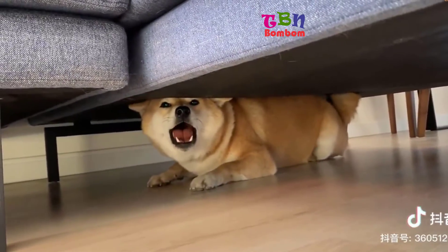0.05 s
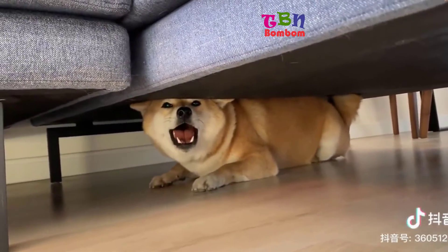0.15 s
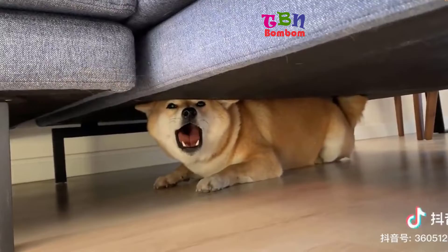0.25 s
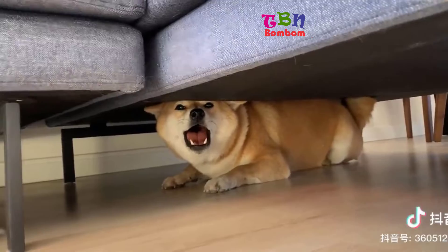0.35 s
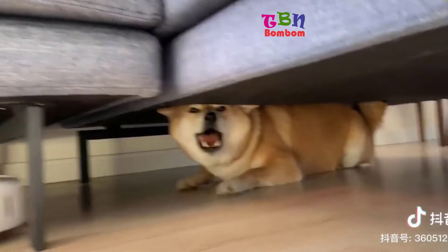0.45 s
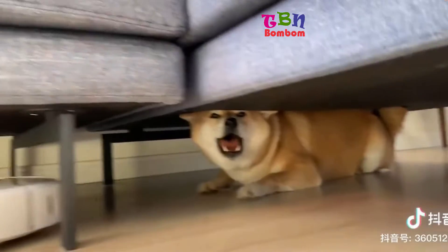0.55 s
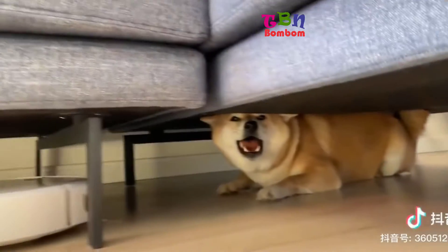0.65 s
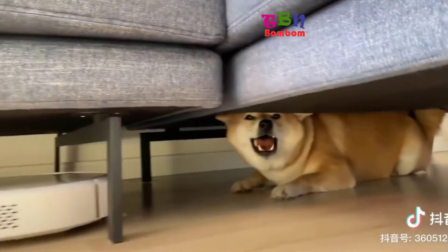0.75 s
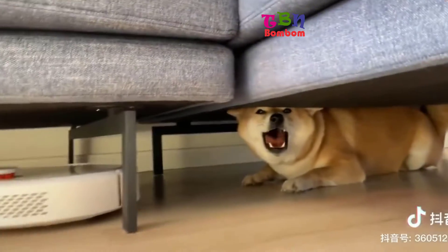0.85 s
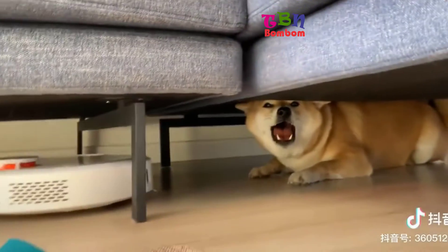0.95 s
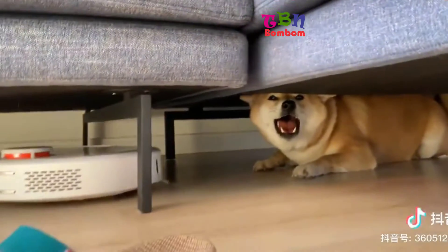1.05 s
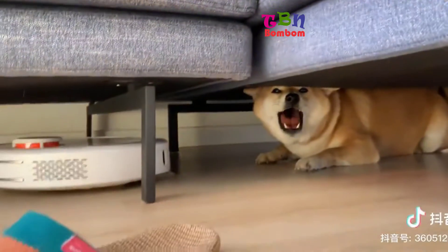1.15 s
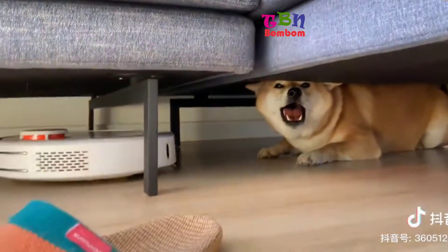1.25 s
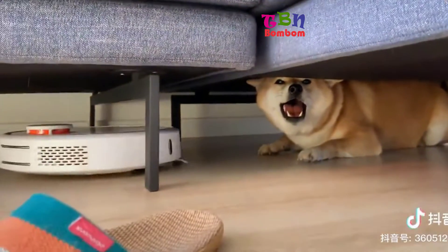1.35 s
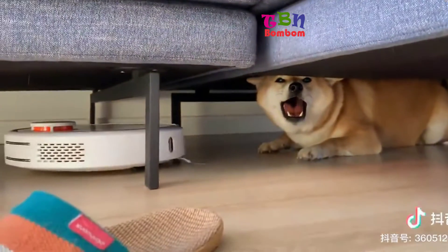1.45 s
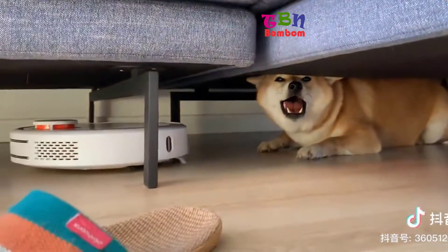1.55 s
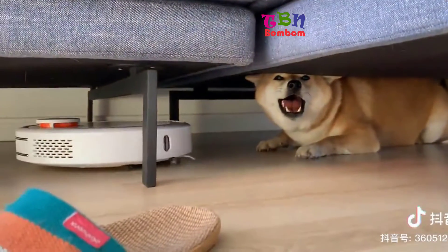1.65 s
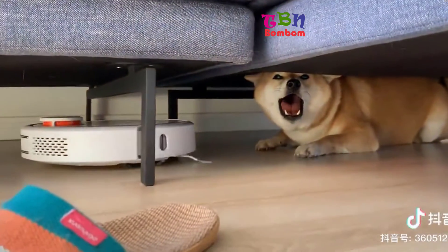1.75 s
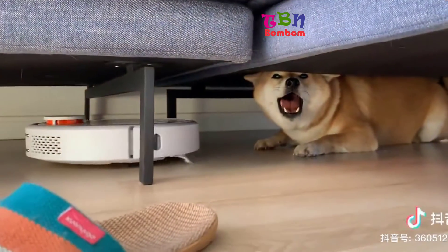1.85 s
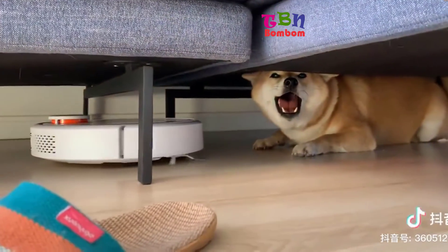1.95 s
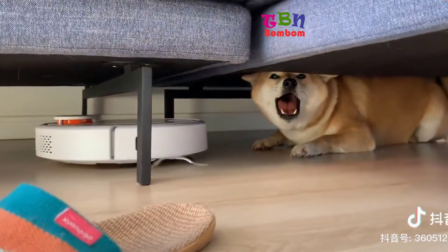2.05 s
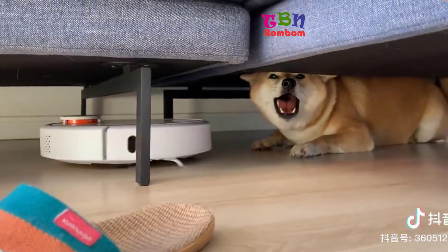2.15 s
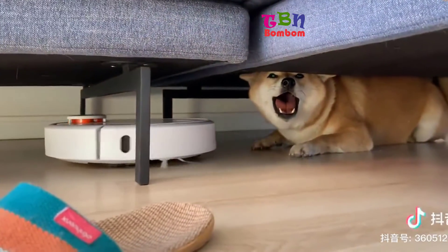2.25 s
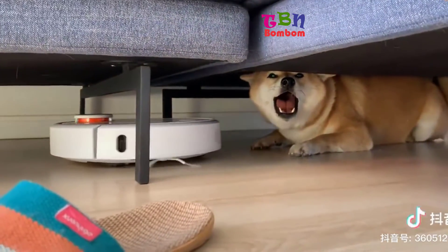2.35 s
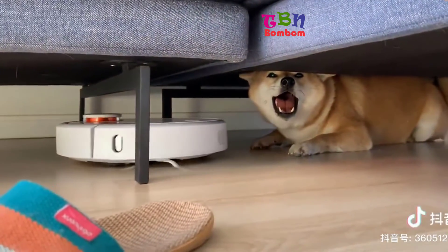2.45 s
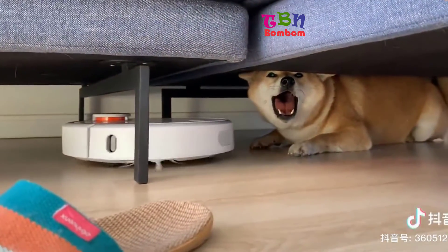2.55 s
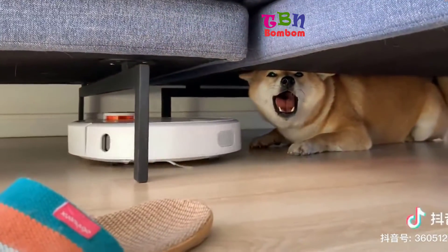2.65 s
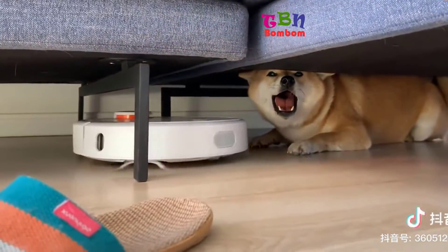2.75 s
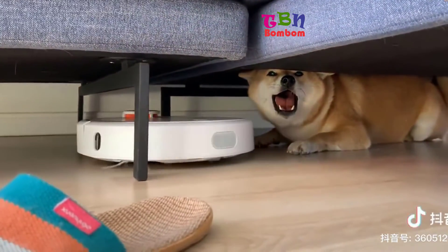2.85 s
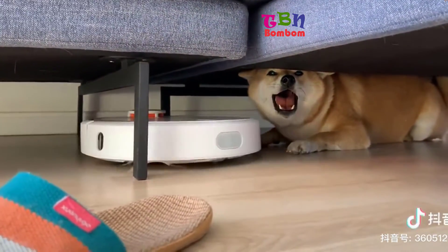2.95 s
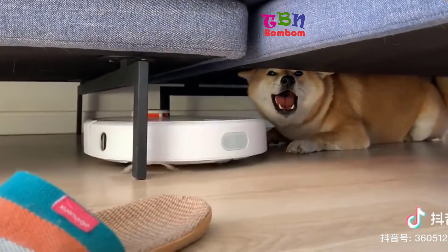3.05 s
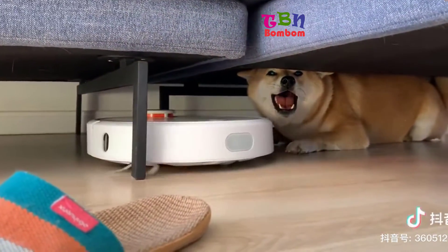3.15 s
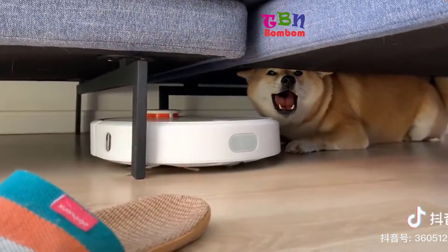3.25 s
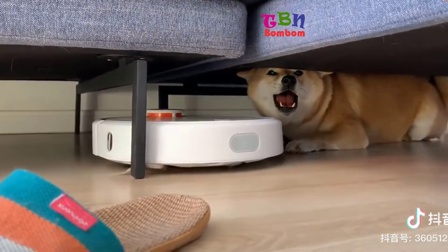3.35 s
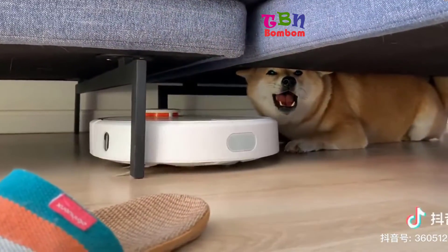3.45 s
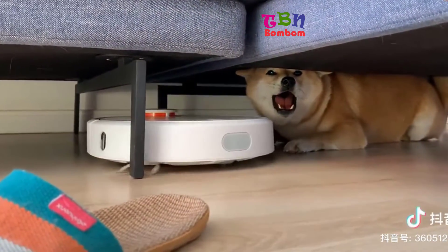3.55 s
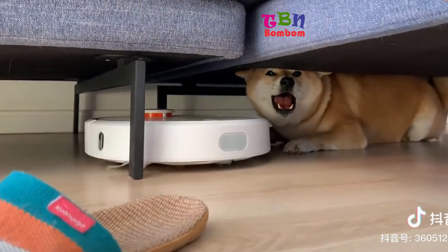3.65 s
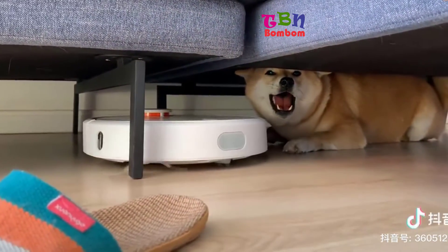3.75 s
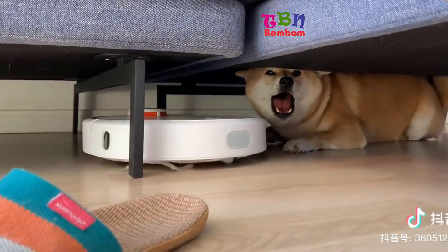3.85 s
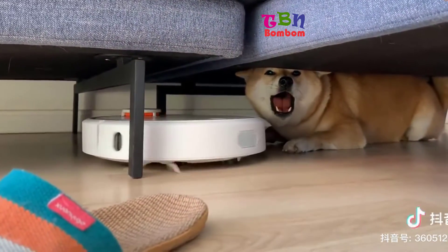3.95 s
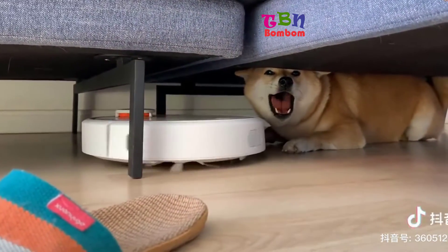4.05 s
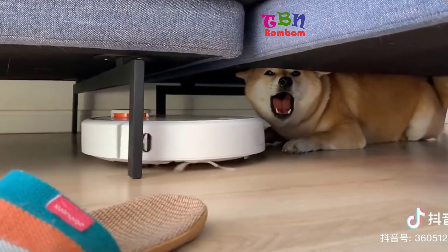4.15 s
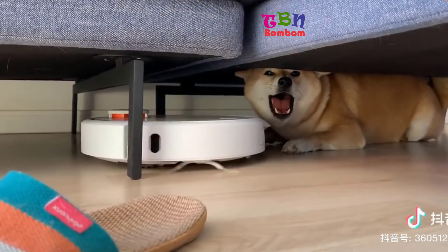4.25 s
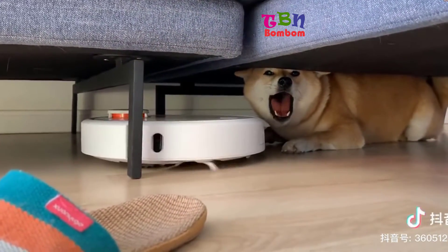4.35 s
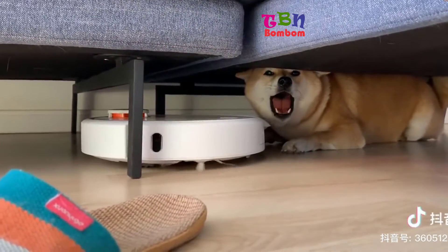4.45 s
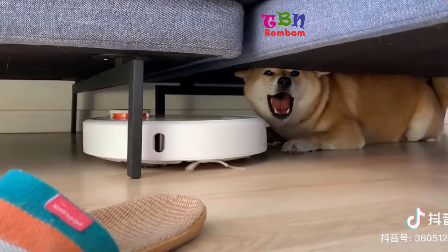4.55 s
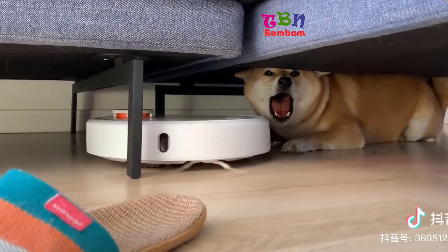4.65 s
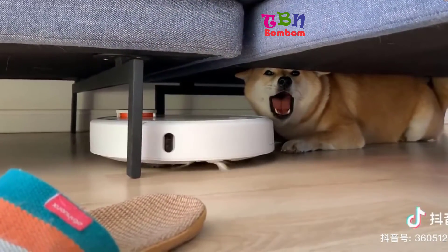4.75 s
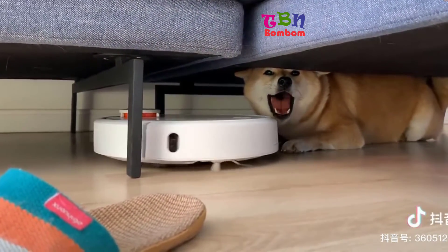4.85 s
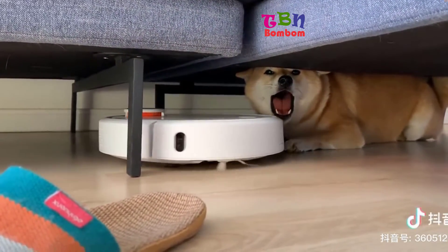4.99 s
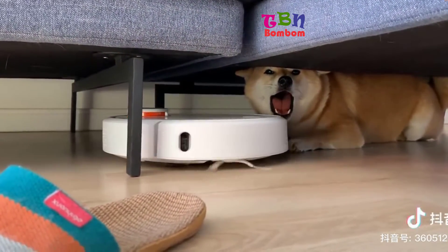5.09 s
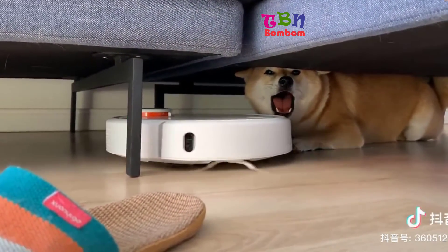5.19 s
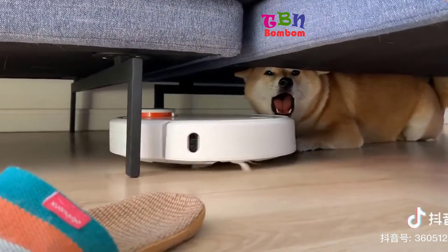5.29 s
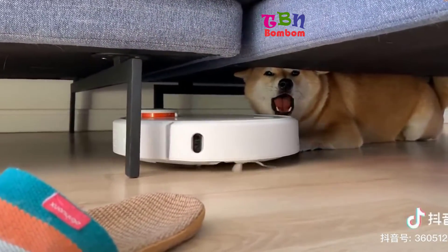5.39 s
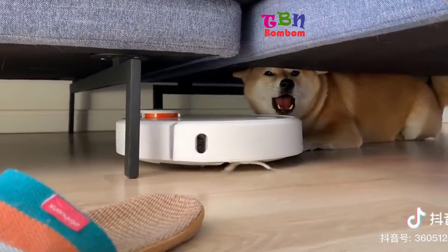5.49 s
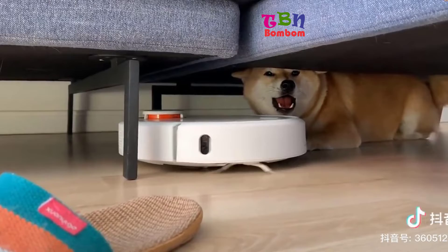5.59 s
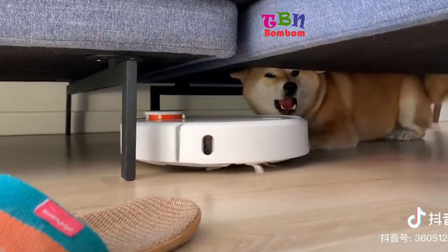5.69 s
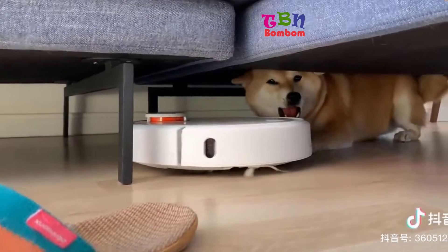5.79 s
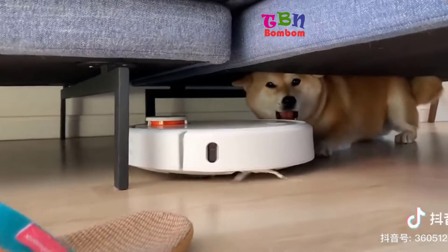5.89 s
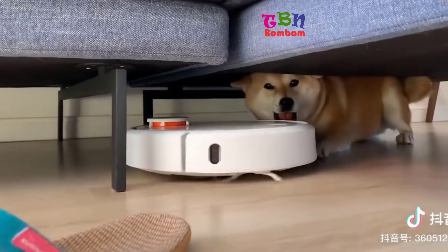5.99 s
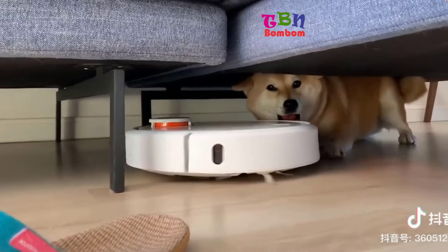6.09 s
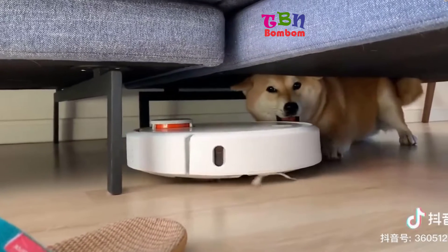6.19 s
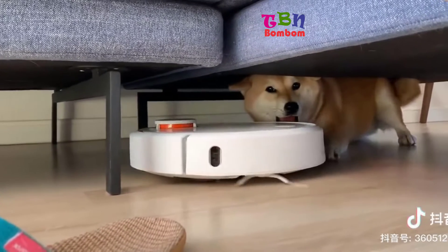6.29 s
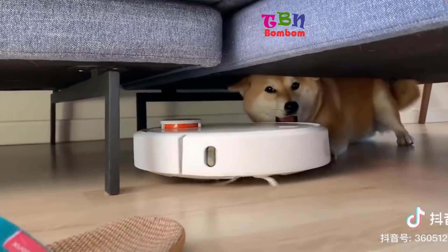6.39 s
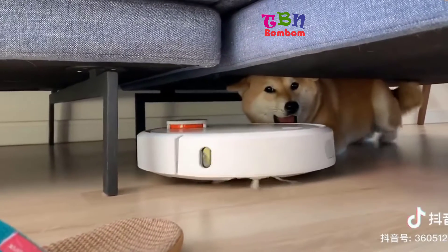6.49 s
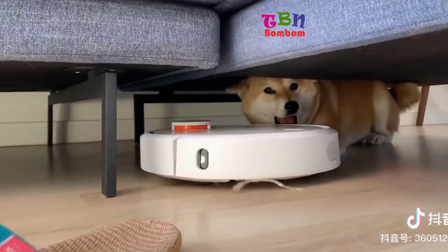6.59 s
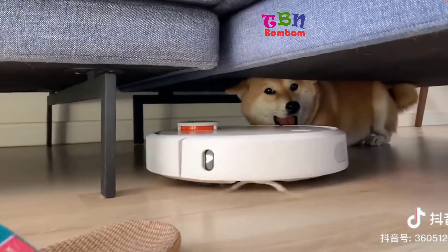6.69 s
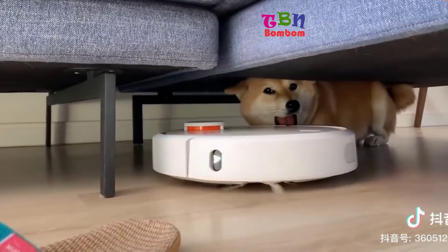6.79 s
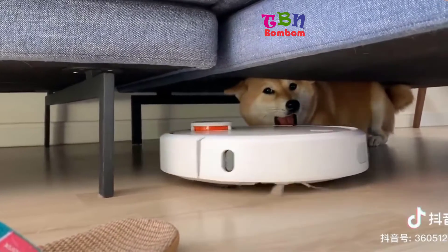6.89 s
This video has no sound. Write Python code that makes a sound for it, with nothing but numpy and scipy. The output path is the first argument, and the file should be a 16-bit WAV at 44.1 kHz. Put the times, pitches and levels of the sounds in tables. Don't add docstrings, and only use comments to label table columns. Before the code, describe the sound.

Close, loud dog yelps ring in a hard-floored living room, with a boxy resonance from the gap under the sofa. Piercing broken shrieks mix with smoother yelps and a held whine, then come in a steady fast series. The voice tires into thin whimpers and a few distant-sounding raspy barks. A low fan hum and airy suction hiss sit far beneath, slightly overloaded peaks on the loudest cries.

```python
import sys
import numpy as np
from scipy import signal
from scipy.fft import rfft, irfft, next_fast_len
from scipy.io import wavfile
from scipy.ndimage import uniform_filter1d, map_coordinates

SR = 44100
rng = np.random.default_rng(int(sys.argv[2]) if len(sys.argv) > 2 else 0)


def output_pcm(signal):
    pcm = np.clip(np.atleast_2d(signal).T, -1, 1) * 32767
    wavfile.write(sys.argv[1], SR, np.round(pcm).astype(np.int16))


def undo_db(level):
    steps = np.asarray(level, float) / 20
    return 10 ** steps


N = 305480

# start t/s, jump after t/s, break after t/s,
# first pitch f/Hz, top pitch f/Hz
SHRIEKS = [(.108, .045, .062, 779.6, 1040), (1.033, .034, 0.074, 842, 1075),
           (1.318, 0.031, 0.059, 872.5, 1079), (1.901, .034, .058, 897, 1086),
           (2.171, 0.028, 0.054, 920, 1077), (2.448, .039, .064, 895.4, 1080),
           (3.982, .022, 0.064, 925.7, 1076), (4.259, .021, .065, 889.5, 1078),
           (4.525, 0.015, 0.07, 951, 1114), (4.801, 0.0095, 0.066, 994, 1111),
           (5.079, 0.0088, 0.064, 1010, 1092)]
# fundamental level/dB, octave level/dB, upper partials level/dB, hoarseness 0-1
SHRIEK_STAGES = [
    (-17.5, -15.5, -21, .1),
    (-15, -11.5, -13.5, 0.04),
    (-14, -6.5, -15, 0.08),
    (-5, -19, -17, .06),
    (-3.5, -16.5, -14, .06),
    (-8.5, -17, -18, .12),
    (-20.5, -15.5, -18, .7),
    (-19.5, -20.5, -24.5, .55),
    (-25.5, -36, -39.5, .25),
    (-30, -26.5, -67, .2),
]
# t/s, strength level/dB, closing pitch f/Hz, take-off pitch f/Hz, share of hoarseness
TIRING = [(.1, 1.5, 490, 1009, 1.1), (1, 1, 498.5, 1001, 1.16), (2.2, 0.5, 500, 988, 1),
          (3.999, 1, 532, 955.7, .9), (4.299, 1, 540.3, 947, .9), (4.5, -0.5, 671.5, 980, 0.85),
          (5.1, -3.5, 613.5, 1034, 0.42)]
# start t/s, length t/s, first pitch f/Hz, top pitch f/Hz, level/dB
YELPS = [
    (.413, .126, 800, 945, -10.5),
    (.708, 0.12, 711.6, 747.4, -18.5),
    (1.615, 0.12, 857.6, 920, -13),
    (2.73, .11, 920, 929.5, -12),
    (3.442, .11, 887.6, 888.5, -15.5),
    (3.709, .11, 863.7, 889, -13),
]
# share of length, share of the fall, fundamental level/dB, octave level/dB,
# upper partials level/dB, hoarseness 0-1
YELP_STAGES = [
    (0, 0, -7.5, -7, -11.5, .15),
    (.12, 0.036, -2.5, -1.5, -9.5, .05),
    (.38, 0.0059, -1, 4.5, 2, 0.02),
    (.47, .12, -1.5, -4.5, -7, .06),
    (.6, .42, -5.5, -4, 1.5, .12),
    (.82, .72, -3.5, -10, -16.5, .35),
    (.92, .88, -8.5, -15, -28, .3),
    (1, 0.98, -22.5, -25.5, -45.5, .1),
]
# t/s, f/Hz
YELP_REST = [(.4, 520.6), (1.6, 570.6), (3.5, 656.5)]
# t/s, pitch f/Hz, fundamental level/dB, mouth opening as overtone level/dB over it
WHINES = [
    [(2.818, 743.2, -19, -0.5), (2.842, 785.3, -17.5, -12), (2.868, 936, -20, -7.5),
     (2.89, 870, -18.5, -0.5), (2.96, 849, -21.5, 2), (2.975, 887, -20.5, 0.5), (3.16, 830, -20, 1),
     (3.205, 805, -21.5, 0), (3.243, 659, -34, -13)],
    [(5.152, 800, -26.5, 3), (5.17, 751, -25.5, 3), (5.215, 877, -27, -7), (5.272, 848, -24, 1.5),
     (5.282, 945, -14, -13), (5.322, 809, -30, 4.5), (5.36, 814, -29, 1.5), (5.428, 824.5, -27, 1)],
    [(5.442, 920, -14.5, -11.5), (5.48, 943.5, -11, -11.5), (5.55, 905, -18, -9.5), (5.575, 859, -23, -18),
     (5.6, 714, -39, -9)],
    [(5.808, 803, -40.5, -5), (5.835, 755, -29.5, 0), (5.865, 770, -30, 4), (5.905, 690, -32, 0),
     (5.948, 697.5, -37.5, 3), (5.975, 610, -41, 5.5), (6.035, 595, -36, -12.5), (6.05, 533.3, -52.5, 6)],
]
# start t/s, length t/s, first pitch f/Hz, top pitch f/Hz, level/dB
BARKS = [
    (6.197, .105, 655, 718, -34),
    (6.434, 0.1, 660, 857, -29.5),
    (6.688, 0.11, 702, 746, -41.5),
]
BARK_STAGES = [
    (0, 0.037, 0, -4.5, -15.5, .2),
    (.15, 0.015, 2, 0.5, -3.5, .1),
    (.3, 0, 14, 1.5, -0.5, .15),
    (.47, 0.046, 8, 0.5, -3, .3),
    (.62, .45, 0.5, -0.5, -9.5, 0.65),
    (.75, .8, -3.5, -11, -28, 0.4),
    (.9, 0.96, -5.5, -8.5, -32, 0.46),
    (1, 1, -17, -15, -39, .2),
]
# f/Hz, level/dB
MOUTH = [(2000, 1), (2700, -1.5), (3400, -13.5), (4000, -13.5), (4500, -52), (5900, -44.5), (6600, -56),
         (9500, -20), (11300, -33.5), (13000, -32.5)]
# f/Hz, width f/Hz, level/dB
THROAT = [(974, 45, 11), (2065, 410, 2.5), (3310, 1100, 0), (3840, 1300, 0)]
# f/Hz, level/dB per Hz
AIR = [(4300, -11), (5300, -26.5), (6300, -8), (9700, -6.5), (11350, -16), (12400, -3), (15400, -23.5)]
# f/Hz, left over right level/dB, right leads phase/rad
PORTS = [(302, -1, 0.27), (920, 2.5, -0.6), (1560, 4.5, 1.56), (2790, 3, 1.25), (3500, -1, 0.76),
         (4500, -0.5, 1.76), (10000, 0, 1.75)]
# f/Hz, t60 t/s
ROOM = [(400, 0.075), (1100, 0.53), (3000, 0.45), (10000, 0.26)]
# f/Hz, width f/Hz, level/dB
SOFA = [(990, 11, 14.5), (2080, 14, -7)]
# f/Hz, level/dB
EARLIER = [(1045, -28), (1950, -25.5)]
# t/s, hum level/dB, hiss level/dB
ROBOT = [
    (0.0, -37, -41.5),
    (4.53, -49.5, -59.5),
    (6.93, -63, -71.5),
]
# f/Hz, level/dB per Hz
HUM = [(15, -18.5), (40, -3), (130, -13), (205, -2), (450, -6.5), (860, -12), (1560, -16.5), (2180, -14.5),
       (3500, -19), (4600, -68.5)]
# f/Hz, level/dB per Hz
HISS = [(3000, -6), (5200, -10.5), (6500, -9), (10100, -15), (11300, -60), (12800, -13), (15100, -19)]
# f/Hz, likeness 0-1
ALIKE = [(40, 0.93), (300, 0.95), (8000, 0.27)]

SWELL_S, JUMP_S, BREAK_S, SLIDE_S = 0.009, 0.004, 0.0065, 0.047
LANDING, EDGE, DROP = 0.98, 0.96, 0.76
TOP_AT = 0.33
YELP_RISE_S, BARK_RISE_S = 0.04, 0.043
REST_HZ, FULL_HZ, THIN_DB_PER_HZ = 544, 800, 0.06
WHINE_UPPER_DB, WHINE_HOARSE, CLOSING_HOARSE = 0.5, 0.027, 0.27
OPEN_S, SHUT_S, JOIN_S = 0.0125, 0.012, 0.03
RING_HZ, RING_WIDTH_HZ, RING_DB = 1060, 75, 10.5
QUAVER = 0.012
BRIGHTER_PER_DB, LEAK = 0.35, 0.2
HUM_SWAY_DB, HISS_PATCH_DB, BAND_LUCK_DB = 1.8, 2, 4
TOP_HZ = 15500


def dog():
    hz, first_db, octave_db, upper_db, hoarse = breath_line()
    hoarse = np.clip(hoarse, 0, 0.95)
    octave_db = octave_db + RING_DB / (1 + ((2 * hz - RING_HZ) / RING_WIDTH_HZ) ** 2)
    hz = hz * (1 + QUAVER * wobble(28) + 0.0046 * wobble(55) + 0.11 * hoarse * wobble(300))
    turn = 2 * np.pi * np.cumsum(hz) / SR
    clean = voiced(hz, turn, first_db, octave_db, upper_db, hoarse)
    shimmer = undo_db(2.5 * hoarse * wobble(250))
    effort = np.sqrt(undo_db(octave_db) ** 2 + undo_db(upper_db) ** 2)
    rasp = undo_db(1.5) * hoarse * effort * fold_noise(turn)
    return np.sqrt(2) * clean * shimmer + rasp + breath(effort, first_db, hoarse)


def voiced(hz, turn, first_db, octave_db, upper_db, hoarse):
    strain = np.clip(np.maximum(first_db, octave_db) + 9.5, -10, 20)
    upper = 0
    for k in range(3, 20):
        brighter = BRIGHTER_PER_DB * strain * np.log2(k / 3) / np.sqrt(k / 3)
        upper = upper + undo_db(along(MOUTH, k * hz) + brighter + 3.04 * wobble(70)) * np.cos(k * turn)
    octave = undo_db(octave_db + 1.67 * wobble(70)) * np.cos(2 * turn)
    overtones = octave + undo_db(upper_db) * upper
    return undo_db(first_db) * np.cos(turn) + (1 - hoarse) ** 0.5 * overtones


def fold_noise(turn):
    closures = np.diff(turn // (2 * np.pi), prepend=0)
    puffs = rng.standard_normal(N) * (closures + 0.28)
    steep = lambda f: resonances(THROAT)(f) / (1 + (600 / (f + 1)) ** 4) / (1 + (f / 4000) ** 10)
    return unit(filtered(puffs, steep))


def breath(effort, first_db, hoarse):
    push = uniform_filter1d(effort + 0.42 * undo_db(first_db), size=500)
    blast = push ** 1.07 * (LEAK + hoarse)
    hiss = filtered(rng.standard_normal(N), lambda f: undo_db(along(AIR, f)))
    return undo_db(-12.5) * blast * patchy(hiss, depth_db=8.5)


def breath_line():
    closed = lambda row, ds: (row[0] + ds, row[1], -75, -75, -75, row[5])
    every, rows, joined = cries(), [], False
    next_starts = [cry[0][0] for cry in every[1:]] + [np.inf]
    for cry, next_start in zip(every, next_starts):
        if not joined:
            rows.append(closed(cry[0], -OPEN_S))
        joined = cry[-1][0] + JOIN_S > next_start
        rows += [row for row in cry if row[0] < next_start]
        if not joined:
            rows.append(closed(cry[-1], SHUT_S))
    return curves(rows)


def cries():
    every = [shriek(*r) for r in SHRIEKS] + [yelp(*r) for r in YELPS]
    every += [yelp(*r, hoarse=True) for r in BARKS] + [whine(p) for p in WHINES]
    return sorted(every, key=lambda cry: cry[0][0])


def shriek(start, jump, snap, first_hz, top_hz):
    when, *cols = np.transpose(TIRING)
    db, low_hz, off_hz, share = (np.interp(start, when, c) for c in cols)
    land = jump + JUMP_S
    slide_s = snap + BREAK_S + SLIDE_S * np.array([0, 0.45, 0.8, 1])
    after = [0, min(SWELL_S, jump / 2), jump, land, land + TOP_AT * (snap - land), snap, *slide_s]
    climb_hz = np.interp(after[1], [0, jump], [first_hz, off_hz])
    arch_hz = top_hz * np.array([LANDING, 1, EDGE])
    slide_hz = DROP * top_hz + (low_hz - DROP * top_hz) * np.array([0, 0.47, 0.82, 1])
    pitch = [first_hz, climb_hz, off_hz, *arch_hz, *slide_hz]
    return [(start + s, hz, a + db, b + db, c + db, h * share)
            for s, hz, (a, b, c, h) in zip(after, pitch, SHRIEK_STAGES)]


def yelp(start, length, first_hz, top_hz, db, hoarse=False):
    stages, rise = (BARK_STAGES, BARK_RISE_S) if hoarse else (YELP_STAGES, YELP_RISE_S)
    rest_hz = REST_HZ if hoarse else np.interp(start, *np.transpose(YELP_REST))
    thin_db = hoarse * THIN_DB_PER_HZ * max(FULL_HZ - first_hz, 0)
    top_at = stages[2][0]
    rows = []
    for at, fall, a, b, c, h in stages:
        s = start + np.interp(at, [0, top_at, 1], [0, rise, length])
        arch = np.sin(np.pi / 2 * min(at / top_at, 1))
        hz = first_hz + (top_hz - first_hz) * arch - fall * (top_hz - rest_hz)
        rows.append((s, hz, a + db - thin_db * (1 - fall), b + db, c + db, h))
    return rows


def whine(points):
    rows = []
    for s, hz, db, mouth in points:
        closing = s == points[-1][0] and db < points[-2][2] - 10
        hoarse = CLOSING_HOARSE if closing else WHINE_HOARSE
        rows.append((s, hz, db, db + mouth, db + mouth + WHINE_UPPER_DB, hoarse))
    return rows


def room(x):
    wet = np.zeros((2, N + SR))
    edges = [0] + [int((cry[0][0] - 0.02) * SR) for cry in cries()[1:]] + [N]
    for a, b in zip(edges, edges[1:]):
        hz, t, z = signal.stft(rng.standard_normal((2, SR // 2)), SR, nperseg=256)
        decay = undo_db(-60 * t / along(ROOM, hz)[:, None])
        tail = signal.istft(z * decay, SR, nperseg=256)[1]
        tail[1] += 0.061 * tail[0]
        part = signal.fftconvolve(x[None, a:b], tail / np.linalg.norm(tail[0]), axes=1)
        wet[:, a + 900:a + 900 + part.shape[1]] += part
    return wet[:, :N] + filtered(x, resonances(SOFA))


def earlier_yelp():
    fading = undo_db(-60 * np.arange(N) / SR / 0.5)
    rings = 0
    for centre, db in EARLIER:
        peak = lambda f: 1 / (1 + ((f - centre) / 50) ** 2)
        rings = rings + undo_db(db) * fading * unit(filtered(rng.standard_normal((2, N)), peak))
    return rings


def robot():
    hum_db, hiss_db = curves(ROBOT)
    hum = undo_db(hum_db + HUM_SWAY_DB * wobble(12)) * rush(HUM)
    return hum + undo_db(hiss_db) * patchy(rush(HISS), depth_db=HISS_PATCH_DB)


def rush(spectrum):
    def shape(hz):
        turn = np.arccos(np.clip(along(ALIKE, hz), -1, 1)) / 2
        return undo_db(along(spectrum, hz)) * [np.cos(turn), np.sin(turn)]
    mid, side = filtered(rng.standard_normal((2, N)), shape)
    return unit(np.array([mid + side, mid - side]))


def patchy(x, depth_db):
    z = signal.stft(x, nperseg=512)[2]
    field = uniform_filter1d(rng.standard_normal(z.shape[-2:]), size=7, axis=0)
    field = uniform_filter1d(field, size=9, axis=1)
    return unit(signal.istft(z * undo_db(depth_db * unit(field)), nperseg=512)[1][..., :N])


def resonances(modes):
    mode = lambda f, c, w, db: undo_db(db) * 1j * f * w / (c * c - f * f + 1j * f * w)
    return lambda f: sum((-1) ** k * mode(f, *row) for k, row in enumerate(modes))


def filtered(x, response):
    m = next_fast_len(N + SR // 2)
    return irfft(rfft(x, m) * response(np.fft.rfftfreq(m, 1 / SR)), m)[..., :N]


def along(points, hz, column=1):
    table = np.transpose(points)
    return np.interp(np.log(hz + 1), np.log(table[0] + 1), table[column])


def curves(rows):
    s, *cols = np.transpose(rows)
    return [np.interp(np.arange(N) / SR, s, c) for c in cols]


def wobble(rate):
    knots = rng.standard_normal(int(N * rate / SR) + 4)
    return map_coordinates(knots, [np.arange(N) * rate / SR])


def unit(x):
    return x / np.sqrt(np.mean(x ** 2) + 1e-20)


def scene():
    voice = dog()
    half = lambda hz: undo_db(along(PORTS, hz) / 2) * np.exp(-0.5j * along(PORTS, hz, column=2))
    near = filtered(voice, lambda hz: np.array([half(hz), 1 / half(hz)]))
    loudness = np.sqrt(np.abs(uniform_filter1d(voice ** 2, size=1500)))
    duck = 1 / (1 + loudness / 1.3)
    return near + duck * (undo_db(-16) * room(voice) + earlier_yelp() + robot())


def thinned(x, margin_db):
    hz, _, z = signal.stft(x, SR, nperseg=1024)
    power = uniform_filter1d(np.abs(z) ** 2, size=16, axis=1).mean(axis=0)
    band = power[8::16].repeat(16, axis=0)[:len(hz) - 1]
    drift = unit(uniform_filter1d(rng.standard_normal(band[::16].shape), size=9, axis=1))
    luck = undo_db(BAND_LUCK_DB * drift).repeat(16, axis=0)
    kept = 1 / (1 + (power.max(axis=0) * luck / (band + 1e-20) * undo_db(-2 * margin_db)) ** 4)
    z[:, :-1] *= np.where(hz[:-1, None] > 4300, kept, 1)
    return signal.istft(z, SR, nperseg=1024)[1][:, :N]


def roll_off(x):
    return signal.sosfilt(signal.butter(12, 15520, fs=SR, output="sos"), x)


def record(dry):
    thumps = filtered(dry ** 2, lambda hz: 1 / (1 + (hz / 60) ** 2))
    bent = dry + 0.0011 * thumps
    flat = bent / (1 + np.abs(bent) ** 8) ** (1 / 8)
    sparse = thinned(flat, margin_db=45)
    mix = filtered(sparse, lambda hz: hz < TOP_HZ)
    return roll_off(mix)


dry = scene()
out = record(dry)
output_pcm(out)
```